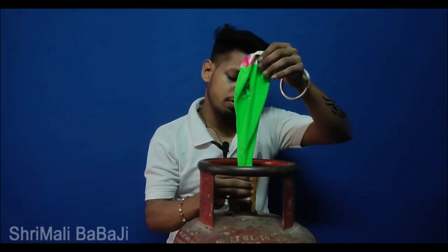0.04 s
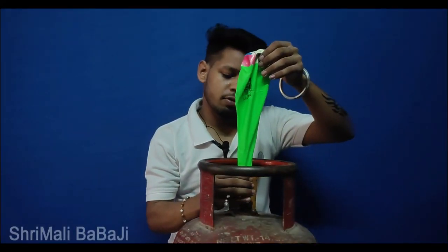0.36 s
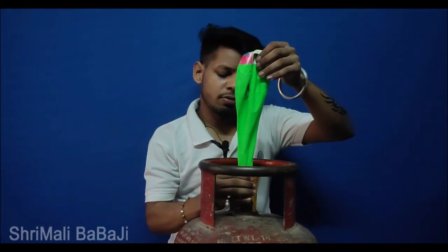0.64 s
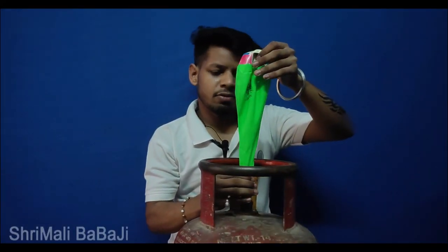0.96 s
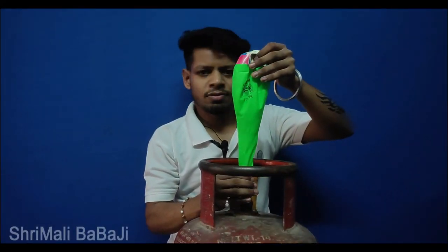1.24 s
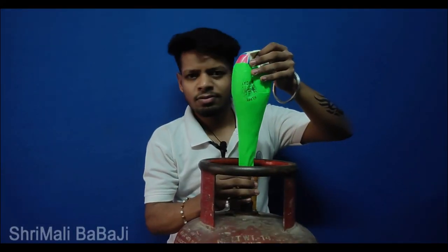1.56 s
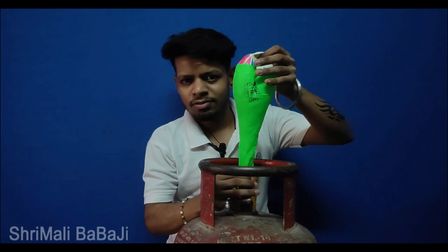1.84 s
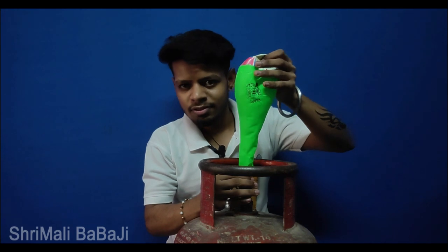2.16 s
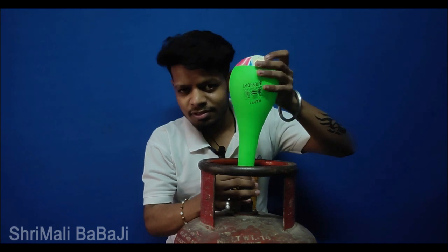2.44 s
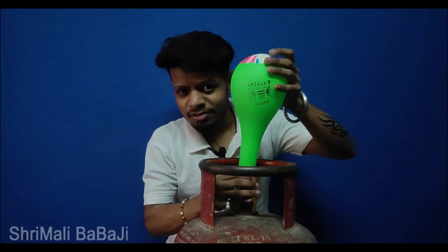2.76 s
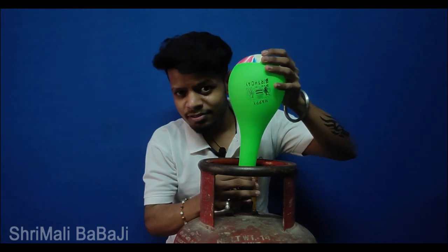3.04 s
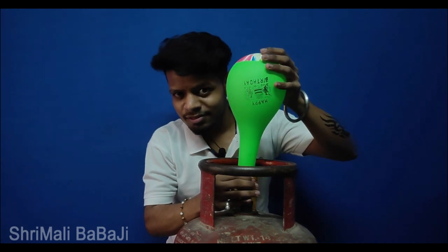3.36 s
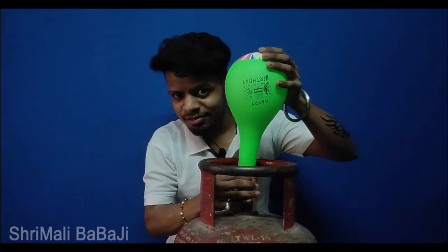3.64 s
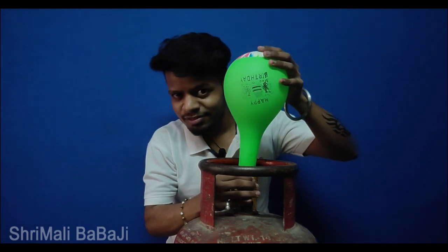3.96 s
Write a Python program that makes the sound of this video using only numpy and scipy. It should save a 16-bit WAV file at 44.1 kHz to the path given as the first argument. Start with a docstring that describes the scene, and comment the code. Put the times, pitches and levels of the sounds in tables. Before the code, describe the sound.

Gas hisses from a cylinder into a balloon, close up in a small room. First a faint leak fades and the valve ticks at 0.3 seconds. At 0.6 the loud, bright hiss starts, dipping briefly near 1, 2.2 and 3.1 seconds and continuing until 4. Its rough whistling tones sink slightly as the balloon swells. Low handling rumble and a few soft knocks lie underneath.

```python
"""Filling a balloon from a gas cylinder

Close up, in a small room. A thin leak fades, the valve ticks and opens, and the jet hisses in four surges.
It rings in the valve and the rubber neck; the resonances sink as the balloon swells.
Handling adds a low rumble and a few soft knocks over the room noise."""
import sys
import numpy as np
from scipy import signal
from scipy.fft import rfft, irfft
from scipy.io import wavfile
from scipy.ndimage import map_coordinates

SR = 44100
rng = np.random.default_rng(int(sys.argv[2]) if len(sys.argv) > 2 else 0)


def waveform_to_disk(signal):
    """Save audio, clipped to [-1, 1], as 16-bit WAV at the path in sys.argv[1]."""
    frames = np.transpose(np.atleast_2d(signal))
    scaled = np.clip(frames, -1, 1) * 32767
    samples = np.round(scaled).astype(np.int16)
    wavfile.write(sys.argv[1], SR, samples)


N = 176400
T = np.arange(N) / SR

# room noise: f/Hz, relative density/dB
ROOM_SPECTRUM = [(20, -23), (45, -2), (100, -5.5), (190, -3), (300, -7.5), (415, -7), (520, -12.5),
                 (1120, -17.5), (1960, -24.5), (3090, -28.5), (4870, -32), (15000, -39)]
# handling rumble: t/s, level/dB
RUMBLE_LEVEL = [(0, -50.5), (.5, -50), (.85, -51.5), (1.35, -56), (1.62, -55.5), (2.0, -52.5),
                (2.22, -43.5), (2.36, -59), (3.2, -55), (4, -64)]
# handling knocks: t/s, onset level/dB, f/Hz, t60/s
KNOCKS = [(0.264, -37, 76, 0.29), (.815, -42, 62, .12), (1.615, -37, 99, .1), (2.262, -26, 450.6, 0.0086)]
# valve tick: f/Hz, relative density/dB
TICK_SPECTRUM = [(500, -10), (1100, 0), (1800, 0), (2700, -12), (5000, -20), (6800, -7), (9000, -16),
                 (10500, -30), (16000, -40)]
# leak whistles: f/Hz, width/Hz, relative level/dB
LEAK_MODES = [(2750, 90, -8), (3070, 43, -2), (3480, 110, -1.5), (3150, 1100, -4)]
# leak fade: t/s, level/dB
LEAK_LEVEL = [(0, -53), (.07, -59), (.16, -62), (.27, -65), (.31, -69), (.45, -72), (.6, -82)]
# changes of grip on the rubber: t/s
GRIP_CHANGES_S = [.98, 2.34, 3.1, 3.42]
# cavity pitch as the balloon swells: t/s, shift/oct
SWELL = [(.6, 0.0049), (1.9, -0.012), (2.7, -0.086), (3.3, -.105), (4.0, -0.14)]
# neck resonances: slack f/Hz, width/Hz, share of the swell shift, relative level/dB in each of five grips
NECK_MODES = [(1395, 322, .1, -3, -4, -7.5, -8.5, -6.5), (1632, 228, .3, -1.5, -1, -1.5, -2, -3),
              (1803, 162, .15, -4.5, -1.5, -0.5, -2, -2), (2000, 250, .1, -6.5, -6, -14.5, -15, -22),
              (2253, 200, .6, -10, -12, -8.5, -4, -7), (2480, 440, .4, -27, -15, -9, -12, -10.5)]
# nozzle whistles: t/s, lower f/Hz, upper f/Hz
WHISTLE_PITCH = [(.6, 2903, 3736), (1.0, 2880, 3736), (1.3, 2944, 3665), (2.25, 2900, 3710),
                 (2.802, 2860, 3649), (3.2, 2818, 3588), (3.599, 2807, 3530), (4, 2733, 3474)]
# lower and upper whistle: slack width/Hz, taut width/Hz, skirt width/Hz, skirt level re core/dB
WHISTLE_SHAPE = [(227, 135, 560, -3), (360, 190, 810, -5)]
# hiss, one spectrum per grip, the last held for the fifth: f/Hz, relative density/dB
HISS_SPECTRA = [
    [(4700, -12), (5500, 0.5), (5900, -4), (6600, 3), (7400, -7.5), (8400, -6), (10200, 0.5), (11200, -3.5),
     (13200, -1), (14800, -8.5)],
    [(4800, -5.5), (5700, -0.5), (6700, 2), (7300, -1), (8000, 2.5), (9400, 1.5), (11000, -2), (12700, 0),
     (15500, -8)],
    [(4500, -6), (5500, -7), (6800, -0.5), (7200, 0.5), (9300, 3), (10400, -3.5), (12800, -4.5),
     (15500, -8)],
    [(4200, -7), (6000, -5.5), (6450, -4), (6750, 0), (9600, 1), (10800, -2.5), (12000, -6.5), (12600, -3),
     (13500, -6), (14200, -3), (15500, -10)],
]
# broad peak in the hiss: t/s, f/Hz, level re broadband hiss/dB
HISS_PEAK = [(.6, 8520, -9), (.85, 8550, -5.5), (1.05, 9320, -4), (1.35, 9380, -10), (1.6, 9260, -17),
             (2.25, 9160, -3), (2.4, 8340, -6.5), (2.65, 7990, -11.5), (3.1, 7790, -15.5),
             (4.0, 7450, -9.5)]
# hiss strength before trim: t/s, level/dB
HISS_LEVEL = [(.578, -66), (.592, -27), (.62, -14), (.66, -19.5), (.725, -16.5), (.82, -21), (.88, -25.5),
              (.96, -28), (1.04, -21.5), (1.12, -19.5), (1.24, -16.5), (1.38, -18.5), (1.45, -14),
              (1.53, -17), (1.64, -15.5), (1.74, -19), (1.82, -18.5), (1.92, -20.5), (1.98, -20.5),
              (2.1, -24.5), (2.2, -25), (2.255, -28.5), (2.31, -17.5), (2.41, -14), (2.52, -16.5),
              (2.68, -15.5), (2.86, -17.5), (2.93, -20), (2.98, -19), (3.05, -25), (3.1, -32.5),
              (3.135, -22.5), (3.175, -14), (3.3, -16.5), (3.58, -17), (3.66, -15), (3.71, -20.5),
              (3.79, -16), (3.88, -17.5), (4, -17.5)]
# jet strength: t/s, neck/dB, lower whistle/dB, upper whistle/dB, low rush before trim/dB
JET_LEVELS = [(0.57, -90, -76, -74, -88), (0.59, -41, -37, -33, -55), (0.6, -24, -25, -25, -39),
              (0.63, -18.5, -18, -26, -41.5), (0.72, -23, -20.5, -22, -37.5),
              (0.83, -21.5, -21.5, -33, -44), (0.87, -26, -27, -36, -43), (0.96, -33.5, -30.5, -39, -54),
              (1.06, -30.5, -26.5, -36, -48), (1.09, -17, -24, -29, -40), (1.15, -22, -25, -32, -42),
              (1.23, -18, -17, -25, -43), (1.29, -28, -22, -36, -44.5), (1.32, -22.5, -22.5, -29, -42),
              (1.58, -22, -19.5, -30.5, -46.5), (1.61, -24.5, -20.5, -28, -37.5),
              (1.75, -21.5, -21, -28, -43), (1.8, -18.5, -17.5, -30, -41.5), (1.93, -24, -24.5, -33, -44),
              (1.97, -21, -21, -29, -42), (2.11, -33, -28, -39.5, -50.5), (2.21, -29, -25.5, -40, -52),
              (2.23, -35, -29, -46, -53), (2.27, -35, -29, -47, -47), (2.29, -32, -21, -30, -48),
              (2.31, -14.5, -18, -25, -38), (2.33, -23, -15.5, -28, -37.5), (2.35, -20, -26, -33, -42),
              (2.37, -21.5, -27, -29, -42), (2.42, -25, -26.5, -25, -36), (2.52, -23, -29, -29, -43.5),
              (2.58, -20, -25, -27, -39.5), (2.64, -23, -26, -33, -38), (2.74, -22.5, -28, -22.5, -41),
              (2.83, -21.5, -26.5, -27, -39), (2.84, -19.5, -26.5, -25, -38), (2.96, -29, -28, -34, -49.5),
              (2.98, -28.5, -24.5, -28.5, -47), (3.08, -32.5, -31.5, -45, -53.5),
              (3.12, -32, -34, -35.5, -58), (3.17, -20.5, -21.5, -26, -38), (3.25, -19, -18, -28, -42.5),
              (3.28, -21.5, -24.5, -28.5, -41.5), (3.72, -19, -28, -25, -41), (3.94, -21, -31, -28, -42.5),
              (4.0, -20.5, -24.5, -24, -42.5)]
# low rush of the jet: f/Hz, relative density/dB
RUSH_SPECTRUM = [(40, -33), (150, -7.5), (290, -7), (400, -9.5), (550, -3), (850, 3), (1150, 2.5),
                 (1500, 1), (2500, -30)]

CAVITY_T60_S, CAVITY_ROUND_TRIP_S = .063, .001
WAVER_PER_S = 3   # the rubber never holds quite still


def from_db(db):
    """Decibels to gain."""
    return 10 ** (np.asarray(db) / 20)


def unit_rms(x):
    """Scale to rms 1."""
    return x / np.sqrt(np.mean(x ** 2) + 1e-20)


def curves(rows):
    """One linearly interpolated curve per column after t/s."""
    times_s, *columns = np.transpose(rows)
    return [np.interp(T, times_s, column) for column in columns]


def fade_in(centre_s, over_s):
    """Smooth step from 0 to 1."""
    return .5 + .5 * np.tanh((T - centre_s) / over_s)


def drift(rate_per_s):
    """Slow random curve, rms about 1."""
    hop, settle = 40, 2000
    pole = np.exp(-2 * np.pi * rate_per_s * hop / SR)
    noise = rng.standard_normal(N // hop + settle + 2)
    slow = signal.lfilter([1], [1, -2 * pole, pole * pole], noise)[settle:]
    return np.interp(np.arange(N) / hop, np.arange(len(slow)), unit_rms(slow))


def highpass(x, hz, order):
    """Butterworth high-pass."""
    return signal.sosfilt(signal.butter(order, hz, "high", fs=SR, output="sos"), x)


def coloured(x, spectrum):
    """Shape noise to a spectrum (f/Hz, level/dB); rms 1."""
    hz, db = np.transpose(spectrum)
    bins_hz = np.maximum(np.arange(N // 2 + 1) * SR / N, 1)
    gain = from_db(np.interp(np.log(bins_hz), np.log(hz), db))
    return unit_rms(irfft(rfft(x) * gain, N))


def glide(x, shift_oct):
    """Bend pitch by reading faster or slower."""
    return map_coordinates(x, [np.cumsum(2 ** shift_oct)], order=3, mode="wrap")


def resonance(x, hz, width_hz):
    """Steep-sided resonance; rms 1."""
    radius = np.exp(-np.pi * width_hz / SR)
    section = [1, 0, -1, 1, -2 * radius * np.cos(2 * np.pi * hz / SR), radius * radius]
    return unit_rms(signal.sosfilt([section, section], x))


def gliding_resonance(x, hz, width_hz):
    """Resonance whose centre follows a curve."""
    return glide(resonance(x, hz.mean(), width_hz), np.log2(hz / hz.mean()))


def room(level_db=-53.5):
    """Steady, bass-heavy room noise."""
    return from_db(level_db) * coloured(rng.standard_normal(N), ROOM_SPECTRUM)


def rumble(lumps_db=1):
    """Dull, lumpy rumble of hands on the cylinder."""
    level_db, = curves(RUMBLE_LEVEL)
    gain = from_db(level_db + lumps_db * drift(14))
    return gain * resonance(rng.standard_normal(N), hz=64.4, width_hz=55)


def knocks():
    """Each touch rings one damped mode."""
    out = 0
    for start_s, db, hz, t60_s in KNOCKS:
        age_s = np.maximum(T - start_s, 0)
        envelope = from_db(db - 60 * np.minimum(age_s / t60_s, 5))
        out += envelope * np.sin(2 * np.pi * hz * age_s)
    return out


def tick(start_s=.314, onset_db=-48, t60_s=.025):
    """Dry noise burst as the valve is turned."""
    age_s = T - start_s
    envelope = (age_s > 0) * from_db(onset_db - 60 * np.clip(age_s / t60_s, 0, 10))
    return envelope * coloured(rng.standard_normal(N), TICK_SPECTRUM)


def leak():
    """Thin whistles from the barely open valve."""
    level_db, = curves(LEAK_LEVEL)
    tones = sum(from_db(db) * resonance(rng.standard_normal(N), hz, width_hz)
                for hz, width_hz, db in LEAK_MODES)
    return from_db(level_db) * unit_rms(tones)


def grips():
    """Weight of each grip on the rubber over time; each fades into the next."""
    begun = [fade_in(start_s, over_s=.085) for start_s in GRIP_CHANGES_S]
    return np.maximum(-np.diff([np.ones(N), *begun, np.zeros(N)], axis=0), 0)


def cavity(echo_gain=1, taps=2048):
    """Turbulence with dense short echoes in the balloon, giving many narrow modes."""
    age_s = T[:taps]
    decay = from_db(-60 * age_s / CAVITY_T60_S) * (age_s > CAVITY_ROUND_TRIP_S)
    response = echo_gain * unit_rms(rng.standard_normal(taps) * decay) / np.sqrt(taps)
    response[0] += 1   # direct sound
    return signal.fftconvolve(rng.standard_normal(N + taps - 1), response, "valid")


def rush(flicker_db=1):
    """Low, flickering noise of the gas flow."""
    return coloured(rng.standard_normal(N), RUSH_SPECTRUM) * from_db(flicker_db * drift(15))


def neck(swell_oct, grip_weights, flicker_db=1.9, waver_oct=.005):
    """Broad resonances of the neck, each flickering alone and sinking with the swell."""
    out = 0
    for hz, width_hz, share, *grip_db in NECK_MODES:
        level_db = np.array(grip_db) @ grip_weights + flicker_db * drift(30)
        ringing = resonance(cavity(echo_gain=.3), hz, width_hz)
        shift_oct = share * swell_oct + waver_oct * drift(WAVER_PER_S)
        out += from_db(level_db) * glide(ringing, shift_oct)
    return unit_rms(highpass(out, hz=970, order=4))


def whistles(levels_db, flicker_db=.37, waver_oct=.00502):
    """Two rough, falling nozzle whistles: cores in wider skirts, narrowing as the rubber tightens."""
    taut = fade_in(centre_s=2.37, over_s=.14)
    out = 0
    for level_db, pitch_hz, shape in zip(levels_db, curves(WHISTLE_PITCH), WHISTLE_SHAPE):
        slack_width_hz, taut_width_hz, skirt_width_hz, skirt_db = shape
        hz = pitch_hz * 2 ** (waver_oct * drift(WAVER_PER_S))
        bands = [(np.sqrt(1 - taut), slack_width_hz), (np.sqrt(taut), taut_width_hz),
                 (from_db(skirt_db), skirt_width_hz)]
        tone = sum(gain * gliding_resonance(cavity(), hz, width_hz) for gain, width_hz in bands)
        out += from_db(level_db + flicker_db * drift(24)) * unit_rms(tone)
    return out


def hiss(swell_oct, grip_weights, flicker_db=1.3, waver_oct=.004):
    """Bright jet hiss: new echoes with each grip, and a broad peak wandering as the balloon stretches."""
    shift_oct = swell_oct + waver_oct * drift(WAVER_PER_S)
    broadband = 0
    for weight, spectrum in zip(grip_weights, HISS_SPECTRA + HISS_SPECTRA[-1:]):
        turbulence = coloured(glide(cavity(), shift_oct), spectrum)
        broadband += np.sqrt(weight) * unit_rms(highpass(turbulence, hz=3660, order=6))
    peak_hz, peak_db = curves(HISS_PEAK)
    peak = gliding_resonance(rng.standard_normal(N), peak_hz, width_hz=700)
    return unit_rms(broadband + from_db(peak_db) * peak) * from_db(flicker_db * drift(16.4))


def jet(rush_trim_db=3, hiss_trim_db=1, flutter_db=.5):
    """Gas entering the balloon: rush, neck, whistles and hiss share one flutter."""
    neck_db, lower_db, upper_db, rush_db = curves(JET_LEVELS)
    hiss_db, = curves(HISS_LEVEL)
    swell_oct, = curves(SWELL)
    grip_weights = grips()
    out = from_db(rush_db + rush_trim_db) * rush()
    out += from_db(neck_db) * neck(swell_oct, grip_weights)
    out += whistles([lower_db, upper_db])
    out += from_db(hiss_db + hiss_trim_db) * hiss(swell_oct, grip_weights)
    valve_open = T > HISS_LEVEL[0][0]
    return out * from_db(flutter_db * drift(58)) * valve_open


def scene():
    """Gas and handling over room noise; mono."""
    return (room() + jet() + leak() + tick() + knocks() + rumble())[None]


def record(dry):
    """Soft peak limit, then a steep low-pass."""
    ceiling, cutoff_hz = .8, 15760
    rounded = dry / (1 + (dry / ceiling) ** 6) ** (1 / 6)
    lowpass = signal.firwin(801, cutoff_hz, window="blackman", fs=SR)
    return signal.fftconvolve(rounded, lowpass[None], "same")


dry = scene()
out = record(dry)
waveform_to_disk(out)
```